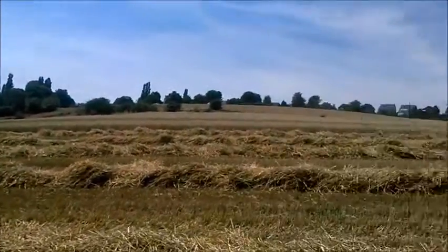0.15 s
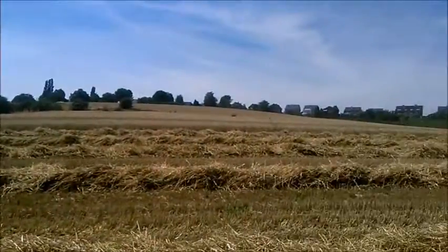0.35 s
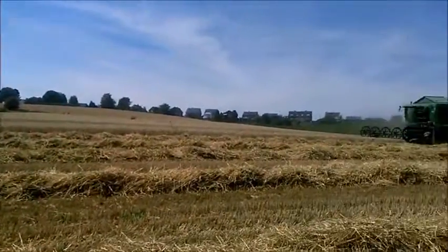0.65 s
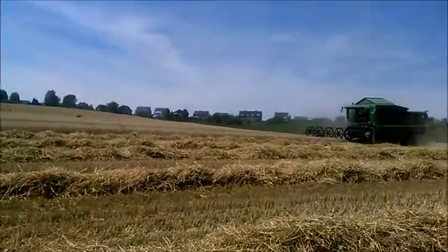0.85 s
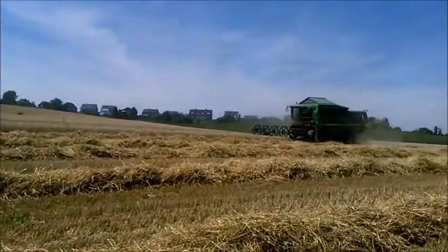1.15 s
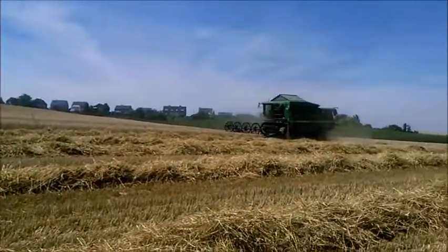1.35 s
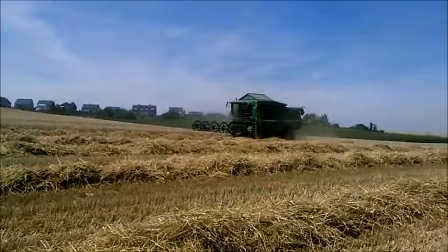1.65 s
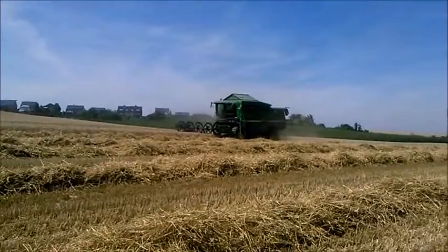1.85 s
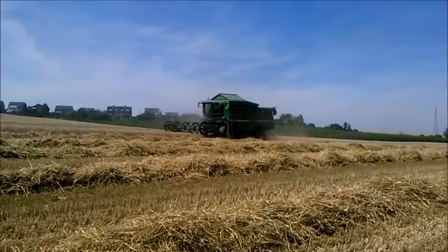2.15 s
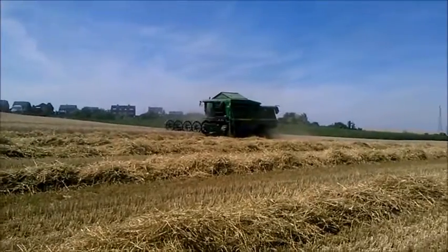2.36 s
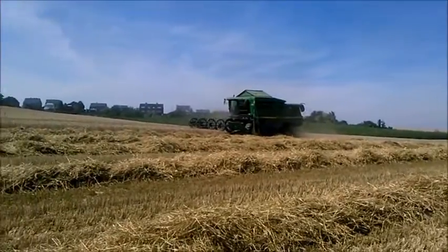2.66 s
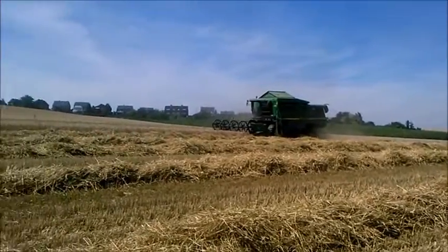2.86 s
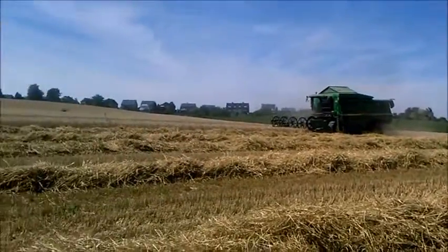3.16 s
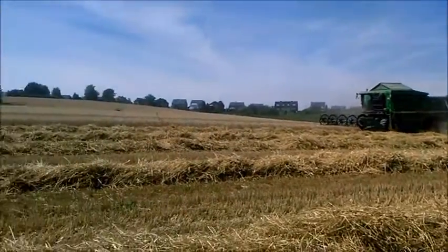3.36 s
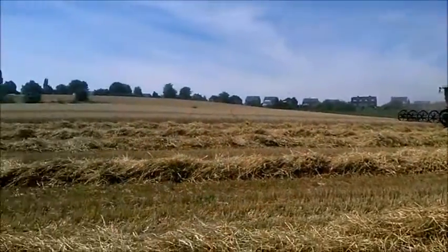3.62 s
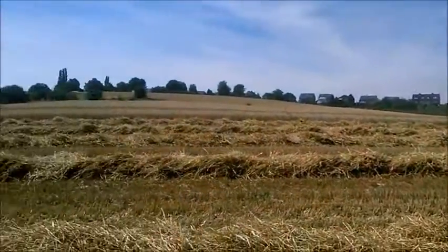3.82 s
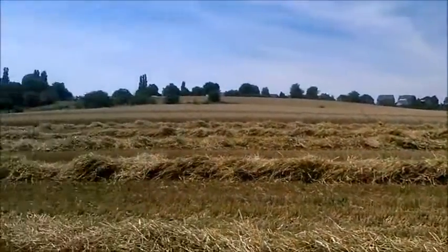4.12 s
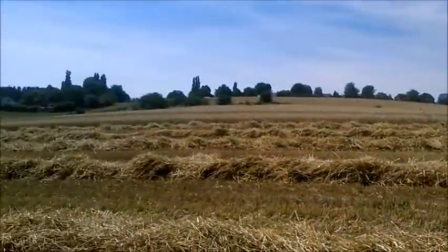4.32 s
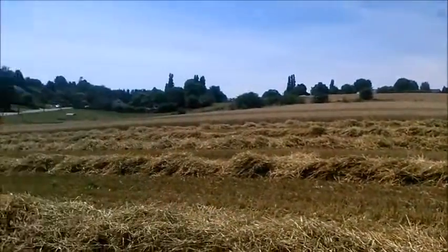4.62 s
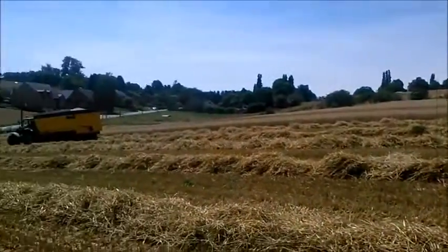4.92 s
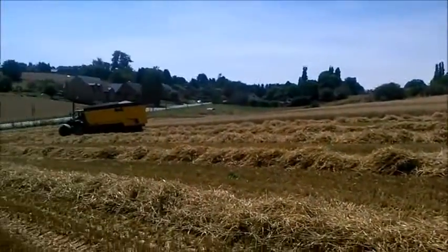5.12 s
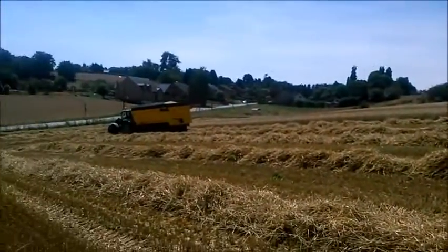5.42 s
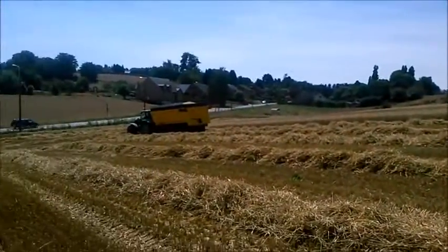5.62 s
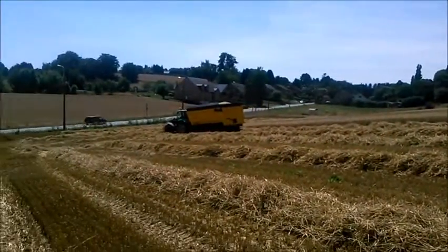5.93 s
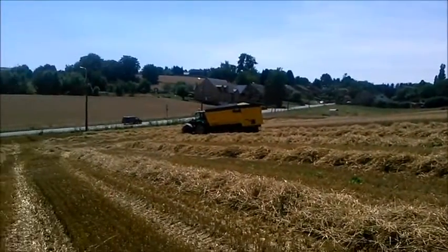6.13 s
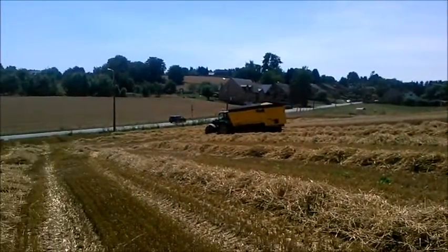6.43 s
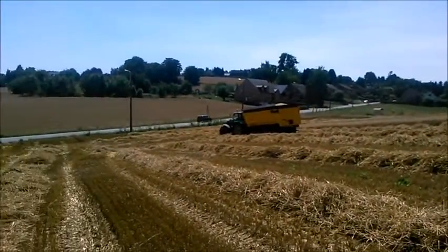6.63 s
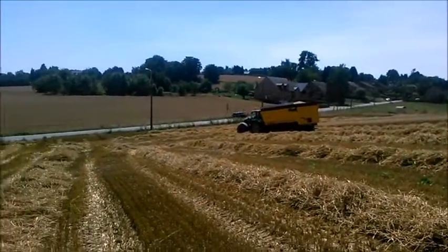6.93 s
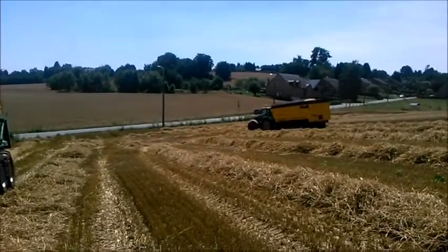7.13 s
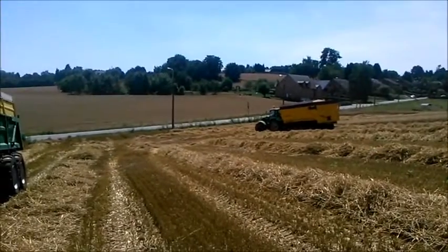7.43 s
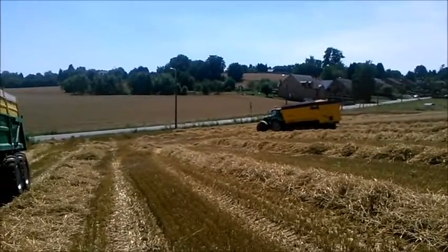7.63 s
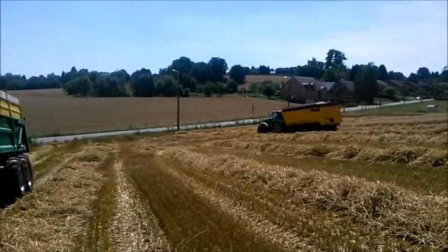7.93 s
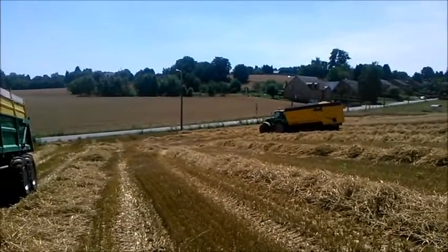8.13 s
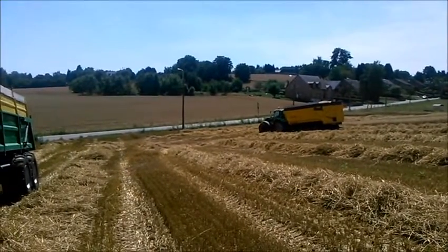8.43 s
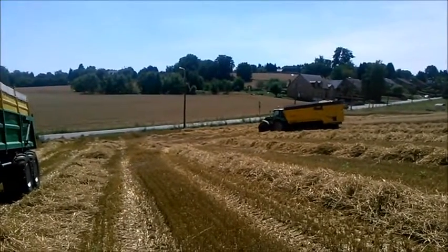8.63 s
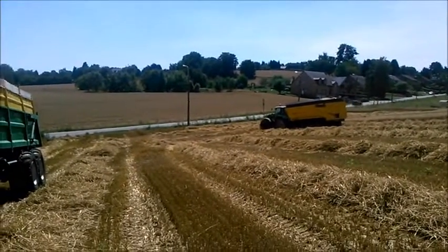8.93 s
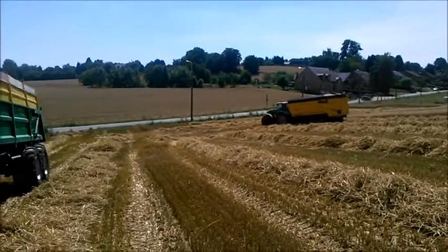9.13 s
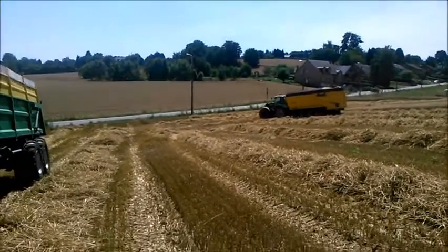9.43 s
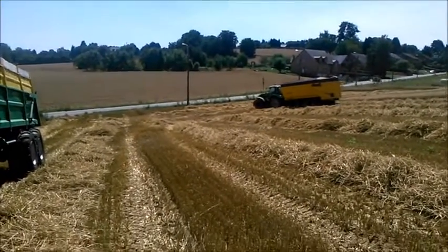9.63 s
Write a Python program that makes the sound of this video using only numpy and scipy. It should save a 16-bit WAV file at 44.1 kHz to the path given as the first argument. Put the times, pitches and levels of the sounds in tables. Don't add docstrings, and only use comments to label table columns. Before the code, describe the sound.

A hand-held microphone in an open stubble field catches an even engine drone with fan and pump tones. Loud low wind rumbles strike at the start and again near five seconds. The roar's hollow colour slides as the holder turns. Stalks crackle nearby in the second half, a faint shaft squeak returns every two seconds, and the pump hum strengthens towards the end.

```python
import sys
import numpy as np
from scipy import signal
from scipy.fft import rfft, irfft
from scipy.io import wavfile
from scipy.ndimage import uniform_filter1d

SR = 44100
rng = np.random.default_rng(int(sys.argv[2]) if len(sys.argv) > 2 else 0)


def amplitude_ratio(level_db):
    exponent = np.asarray(level_db, float) / 20
    return 10 ** exponent


def unload_audio(sound):
    columns = np.transpose(np.atleast_2d(sound))
    steps = np.round(np.clip(columns, -1, 1) * 32767)
    wavfile.write(sys.argv[1], SR, steps.astype(np.int16))


N = 430857
SIZE, HOP = 1024, 256
HZ = np.fft.rfftfreq(SIZE, 1 / SR)
BIN_HZ = HZ[:, None]
FRAME_S = np.arange(N // HOP + 5) * HOP / SR
TIME_S = np.arange(N) / SR
LATE_POWER = 2.5

# (time [s], chest delay [ms], arm delay [ms])
ECHO_DELAYS = [(0, 1.22, .82), (.3, 1.46, .93), (.55, 1.61, 1.04), (.8, 1.7, 1.12), (1.1, 1.755, 1.14),
               (3.1, 1.76, 1.14), (3.5, 1.745, 1.16), (3.9, 1.67, 1.13), (4.5, 1.46, 1.02),
               (4.75, 1.32, .95), (5.25, 1.04, .68), (5.9, .95, .62), (5.95, .94, 1.16), (6.6, .83, 1.13),
               (7, .79, 1.11), (7.6, .775, 1.1), (9.77, .785, 1.11)]
# (time [s], echo delay [ms])
HAND_DELAY = [
    (5.25, .099),
    (6.3, .09),
    (7.6, .075),
    (9.77, .072),
]
# (time [s], level [dB])
PUMP_LOAD = [
    (0, -3.5),
    (2, -0.5),
    (5, -3),
    (7.5, -0.5),
    (8.5, 4),
    (8.8, 6.5),
    (9.77, 3.5),
]


def evened(x):
    return x / np.sqrt(np.mean(abs(x) ** 2) + 1e-20)


def read(points, hz):
    f, value = np.transpose(points)
    return np.interp(np.log(hz + 1), np.log(f + 1), value)


def columns(rows, t):
    s, *rest = np.transpose(rows)
    return [np.interp(t, s, c) for c in rest]


def drift(rate_hz):
    f = np.fft.rfftfreq(N, 1 / SR)
    return evened(irfft(rfft(rng.standard_normal(N)) / (1 + (f / rate_hz) ** 4), N))


def banded(shape, lo_hz, hi_hz):
    inside = (HZ > lo_hz) & (HZ < hi_hz)
    return shape / np.sqrt((abs(shape[inside]) ** 2).sum(0))


def noise(shape, patchy_db, flicker_db):
    a, b, patches = rng.standard_normal((len(FRAME_S), len(HZ), 3)).T
    patches = uniform_filter1d(patches, size=12, axis=0)
    patches = evened(uniform_filter1d(patches, size=14, axis=1))
    flicker = evened(uniform_filter1d(rng.standard_normal(len(FRAME_S)), size=8))
    z = (a + 1j * b) * shape * amplitude_ratio(patchy_db * patches + flicker_db * flicker)
    return signal.istft(z, nperseg=SIZE, noverlap=SIZE - HOP)[1][:N] * 1.137


def colour(x, points, lo_hz, hi_hz):
    f = np.fft.rfftfreq(N, 1 / SR)
    z = rfft(x) * amplitude_ratio(read(points, f))
    inside = (f > lo_hz) & (f < hi_hz)
    rms = np.sqrt(2 * (abs(z[inside]) ** 2).sum()) / N
    return irfft(z, N) / rms


def tone(hz, db, wander_hz, waver_db, rate_hz):
    phase = 2 * np.pi * np.cumsum(hz + wander_hz * drift(rate_hz)) / SR
    return np.sqrt(2) * amplitude_ratio(db + waver_db * drift(rate_hz)) * np.sin(phase)


def swells(t, floor_db, centre_s, half_s, db):
    power = amplitude_ratio(floor_db) ** 2
    for c, h, d in zip(centre_s, half_s, db):
        power = power + amplitude_ratio(d) ** 2 * np.exp(-((t - c) / h) ** 2)
    return 10 * np.log10(power)


def facing(t):
    return np.clip((1.75 - columns(ECHO_DELAYS, t)[0]) / 1.01, 0, 1)


def turned_db(away_db, facing_db, turn):
    return away_db + (facing_db - away_db) * turn


def shade_db():
    # (time [s], lower band [Hz], depth [dB])
    shoulder = [(0, 3750, -7), (.5, 3600, -7), (.95, 3300, -4), (2, 3080, -4), (3.4, 3220, -5),
                (4, 3560, -7), (4.6, 3850, -6), (5.1, 4350, -4), (5.4, 4500, 0)]
    hz, depth_db = columns(shoulder, FRAME_S)
    half_width = .065
    return depth_db * sum(np.exp(-((BIN_HZ / hz - k) / half_width) ** 2) for k in (1, 1.58))


def roar():
    # (time [s], level [dB])
    roar_level = [(0.0, -47.5), (1.88, -46.5), (3.37, -46), (4.33, -47.5), (4.95, -46), (6.37, -47.5),
                  (6.99, -45.5), (7.51, -46.5), (9.06, -45.5), (9.77, -46.5)]
    # (frequency [Hz], density [dB per Hz])
    bass = [(88, -32), (150, -3), (188, -8), (244, -7.5), (340, -22), (462, -16.5), (529, -10),
            (614, -18.5), (792, -14), (900, -21), (1170, -51), (1980, -120)]
    # (frequency [Hz], density [dB per Hz])
    treble = [(1050, -16.5), (1540, -17), (1870, -17.5), (2270, -18.5), (2750, -23.5), (3330, -27.5),
              (4040, -24), (4900, -22), (5940, -29), (7200, -33), (8500, -38.5), (11000, -72)]
    # (time [s], chest [0-1], arm [0-1], hand [0-1])
    echo_share = [(0, .35, 0.2, .7), (1.5, 0.37, 0.3, 0.52), (3.2, 0.35, .2, 0.57), (4, 0.53, 0.22, .55),
                  (4.7, 0.28, 0.43, 0.66), (5.5, .28, .5, 0.65), (5.95, .3, 0.08, 0.74),
                  (8.4, 0.63, 0.13, 0.58), (9.77, 0.36, .15, 0.38)]
    level_db, = columns(roar_level, FRAME_S)
    chest_ms, arm_ms = columns(ECHO_DELAYS, FRAME_S)
    hand_ms, = columns(HAND_DELAY, FRAME_S)
    chest, arm, hand = columns(echo_share, FRAME_S)
    load_db, = columns(PUMP_LOAD, FRAME_S)
    turn = facing(FRAME_S)

    tilt_db = -2 + 4.5 * turn - 0.4 * load_db
    shape_db = read(bass[:-3] + treble, BIN_HZ) + tilt_db * np.log(np.maximum(BIN_HZ, 1000) / 2500)
    shape_db = shape_db + 6.9 * turn * np.exp(-((BIN_HZ - 500) / 300) ** 2)
    shape_db = shape_db + shade_db()

    spin = -2j * np.pi * BIN_HZ / 1000
    body_low_cut = BIN_HZ ** 2 / (BIN_HZ ** 2 + 700 ** 2)
    cloth_loss = .75 / (.35 + .6 * (BIN_HZ / 3000) ** 2) ** .5
    far = body_low_cut * cloth_loss * (chest * np.exp(spin * chest_ms) + arm * np.exp(spin * arm_ms))
    comb = (1 + far) * (1 + hand * np.exp(spin * hand_ms))
    shape = amplitude_ratio(level_db) * banded(amplitude_ratio(shape_db) * comb, 900, 2800)
    body = noise(shape, patchy_db=0.72, flicker_db=0.29)
    return body * (1 + 0.041 * np.cos(2 * np.pi * 118.2 * TIME_S))


def engine_and_drum():
    # (level turned away [dB], level facing [dB])
    firing = [
        (-42.5, -44.5),
        (-42.5, -44),
        (-45, -48.5),
    ]
    late = facing(TIME_S) ** LATE_POWER
    first_db, second_db, drum_db = [turned_db(*levels, late) for levels in firing]
    out = tone(118.2, first_db, 0.5, 1.5, 5.8)
    out += tone(236.4, second_db, .25, 0.88, 4.)
    return out + tone(138.5, drum_db, .8, 2.6, 4.)


def fan():
    # (level turned away [dB], level facing [dB], share of load [0-1])
    blade_orders = [
        (-52.5, -48, .1),
        (-50, -61, 0.11),
        (-50.5, -50.5, 0.88),
    ]
    late = facing(TIME_S) ** LATE_POWER
    load_db, = columns(PUMP_LOAD, TIME_S)
    out = np.zeros(N)
    for order, (away_db, facing_db, share) in enumerate(blade_orders, 1):
        out += tone(266.8 * order, turned_db(away_db, facing_db, late) + share * load_db, 1.185, 0.91, 7.1)
    return out


def pump_and_gears():
    # (frequency [Hz], level [dB])
    pump_orders = [
        (510.5, -64.5),
        (1021, -60),
        (1531.5, -65),
    ]
    # (frequency [Hz], level turned away [dB], level facing [dB], wander [Hz])
    steady_tones = [(59.2, -60, -52.5, 2.8), (69.5, -52, -55, 9.2), (746, -80, -60, 19.8),
                    (1334.3, -62.5, -60.5, 4), (1601, -61.5, -86, 6), (2042, -63.5, -83, 6.1),
                    (2548, -69.5, -65.5, 8.04), (4090, -75, -92, 14), (4570, -82, -88, 16),
                    (5604, -84, -95, 18.3), (6122, -79, -95, 18), (6640, -82, -95, 18)]
    load_db, = columns(PUMP_LOAD, TIME_S)
    mesh_s, rise_s, settle_s = 6.9, .4, .7
    engaged = np.clip(1 + (TIME_S - mesh_s) / rise_s, 0, 1)
    surge_db = 8 * np.exp(-np.maximum(TIME_S - mesh_s, 0) / settle_s)
    out = tone(2711.5, -67 + engaged * (5 + surge_db), 2.53, 2.3, 4.9)
    for hz, db in pump_orders:
        out += tone(hz, db + load_db, 2.18, 2.4, 7.14)
    turn = facing(TIME_S)
    for hz, away_db, facing_db, wander_hz in steady_tones:
        out += tone(hz, turned_db(away_db, facing_db, turn), .3 * wander_hz, 2.36, 5.08)
    return out


def turbo():
    # (time [s], pitch [Hz], level [dB])
    whistle = [(.3, 9450, -82), (.45, 9430, -68), (.75, 9220, -68), (.92, 9260, -65), (1.3, 9170, -69),
               (1.6, 9200, -86), (3.05, 9250, -88), (3.25, 9280, -68), (3.55, 9300, -82), (4, 9190, -77),
               (4.75, 9070, -67), (5.5, 9070, -61), (6.5, 9250, -61), (6.75, 9140, -63), (7.4, 9350, -61),
               (8.1, 9240, -66), (8.9, 9100, -66), (9.77, 9270, -64)]
    hz, db = columns(whistle, TIME_S)
    gaps = np.clip(3 * drift(14), 0, 1)
    return tone(hz, db + 1.1 - 12 * gaps, 18., 2., 14.1)


def rustle():
    # (time [s], level [dB])
    rustle_level = [(0, -59.5), (1.0, -59), (1.41, -65.5), (2.67, -68.5), (3.13, -62), (3.73, -58.5),
                    (4.38, -61), (4.92, -57.5), (5.41, -49), (5.77, -53.5), (5.99, -50.5), (6.45, -55),
                    (6.99, -51.5), (7.7, -54.5), (8.25, -52), (9.22, -51), (9.39, -53), (9.77, -51.5)]
    # (frequency [Hz], density [dB per Hz])
    straw_colour = [(2350, -49), (4000, -8), (4890, -15), (5460, -9.5), (6130, -2), (7190, -4),
                    (9310, -3.5), (12300, -6.5), (14100, -10)]
    # (time [s], half length [s], level [dB])
    crunches = [
        (5.2, .07, -61),
        (5.41, .08, -57),
        (6, .1, -64),
        (9.42, .04, -60),
        (9.565, 0.047, -55),
    ]
    near_db, = columns(rustle_level, FRAME_S)
    hand_ms, = columns(HAND_DELAY, FRAME_S)
    chest_ms = columns(ECHO_DELAYS, FRAME_S)[0]
    turn = facing(FRAME_S)
    open_ms, shut_ms = .099, .074
    cover = ((open_ms - hand_ms) / (open_ms - shut_ms)) ** 2

    crunch_columns = np.transpose(crunches)
    level_db = swells(FRAME_S, near_db, *crunch_columns)
    chaff_db = -60 - 6.5 * turn - 21 * cover
    low_db = swells(FRAME_S, chaff_db, *crunch_columns) - level_db - 0.5
    top_db = -9 + 7.5 * turn ** LATE_POWER + 2.9 * (level_db - near_db)

    shape = banded(amplitude_ratio(read(straw_colour, HZ))[:, None] * np.ones(len(FRAME_S)), 7340, 12100)
    low = 1 / (1 + (BIN_HZ / 7200) ** 12)
    top = 1 / (1 + (12750 / (BIN_HZ + 1)) ** 50)
    echo = 0.54 * (1 - turn) * np.exp(-2j * np.pi * BIN_HZ * chest_ms / 1000)
    shape = shape * (1 + low * echo / (1 + (5000 / (BIN_HZ + 1)) ** 12))
    tilt_db = -5 * (turn - 0.38) * np.clip((BIN_HZ - 10300) / 1800, -.4, 1)
    shape = shape * amplitude_ratio(shade_db() + tilt_db)
    return noise(shape * amplitude_ratio(level_db + low * low_db + top * top_db), patchy_db=1.43, flicker_db=0.67)


def snaps():
    # (time [s], peak level [dB], centre [Hz])
    snap_events = [(5.2174, -45, 9000), (5.225, -36, 4500), (5.2334, -41, 13000), (5.2334, -41, 5500),
                   (5.245, -42, 4500), (5.3732, -39, 9000), (5.4194, -42, 7000), (5.44, -44, 6000),
                   (5.9833, -47, 6000), (7.443, -44, 5500), (9.4174, -43, 7500), (9.5614, -36, 6000)]
    out = np.zeros(N)
    t = np.arange(600) / SR
    for s, db, hz in snap_events:
        band = signal.butter(1, [hz / 1.33 / SR * 2, hz * 1.25 / SR * 2], "band")
        grain = evened(signal.lfilter(*band, rng.standard_normal(600)))
        out[round(s * SR):][:600] += amplitude_ratio(db - 6 - 60 * t / 0.047) * grain
    return out


def squeaks():
    # (time [s], level [dB], length [s])
    squeak_events = [
        (2.06, -69, .07),
        (4.05, -76, .05),
        (6.08, -57, 0.05),
        (8.1, -62, .025),
        (8.13, -59, .05),
    ]
    ring = tone(12300., 0, 60., 3., 60.)
    out = np.zeros(N)
    for s, db, length_s in squeak_events:
        half_s = length_s / 2
        out += amplitude_ratio(db) * ring * np.exp(-((TIME_S - s - half_s) / half_s) ** 4)
    return out


def buffeting():
    # (frequency [Hz], density [dB per Hz])
    buffet_colour = [(8.8, -29), (15, -1.5), (60, -2), (113, -7), (145, -11.5), (209, -20), (225, -18.5),
                     (242, -19), (300, -36), (390, -62), (660, -120)]
    out = colour(rng.standard_normal(N) * amplitude_ratio(2.0 * drift(13.0)), buffet_colour, 16, 110)
    deepest = signal.filtfilt(*signal.butter(2, 60. / SR * 2), out)
    return out - 0.48 * deepest * (TIME_S < 1)


def sharp_eddies(level_db):
    # (frequency [Hz], density [dB per Hz])
    eddy_colour = [(24, -33), (40, -0.5), (158, -0.5), (543, -13.5), (717, -18), (751, -23), (824, -26),
                   (1120, -30), (1310, -40), (1600, -43), (2080, -75), (3520, -120)]
    per_s = 190
    struck = rng.random(N) < per_s / SR
    strength = np.minimum(rng.exponential(1, N), 3)
    pulses = struck * -amplitude_ratio(3.2 * strength + 2.5 * drift(30.0))
    eddies = colour(evened(pulses) + 0.38 * rng.standard_normal(N), eddy_colour, 290, 500)
    dull = signal.filtfilt(*signal.butter(2, 480. / SR * 2), eddies)
    treble_db = 0.52 * np.minimum(level_db + 30.0, 3)
    return dull + (eddies - dull) * amplitude_ratio(treble_db)


def thumps():
    # (time [s], peak level [dB], width [ms])
    thump_events = [(.068, -15.5, .5), (.084, -16.5, 0.53), (.13, -15, .5), (.197, -15, .55),
                    (0.476, -16, .45), (.397, -13, 0.8), (.445, -15, 0.83), (.587, -13, 1.1),
                    (.8, -15, 1.9), (.838, -13.5, 1.5), (3.661, -17, 1.9), (4.388, -17, 1.4),
                    (4.635, -20.5, 1), (4.705, -17, 1.24), (4.817, -15, 0.58), (4.823, -14, 0.45),
                    (4.863, -16, 0.86), (4.958, -14, 0.87), (5.178, -18, 1.5), (4.914, -14, 1.66),
                    (5.906, -18, 0.99)]
    out = np.zeros(N)
    for s, db, width_ms in thump_events:
        u = (TIME_S - s) / (width_ms / 1000)
        slow_push = 0.19 * np.exp(-(u / 9.4) ** 2)
        suck = np.exp(-u ** 2)
        rebound = 0.34 * np.exp(-(u - 2.2) ** 2)
        out += amplitude_ratio(db) * (slow_push - suck + rebound)
    return out


def wind():
    # (time [s], half length [s], deep buffeting [dB], sharp eddies [dB])
    gusts = [(.35, .4, -33, -41), (.11, .05, -26, -34.5), (.2, 0.053, -30, -30.5),
             (0.304, 0.078, -25, -36.5), (0.398, .03, -29, -32), (0.462, 0.042, -30, -33),
             (.59, 0.051, -27.5, -34), (0.678, .05, -32, -36), (.79, 0.054, -33, -34),
             (.88, .04, -33, -43.5), (1.3, .15, -39, -62), (3.66, 0.056, -33.5, -55),
             (4.167, 0.084, -36, -47.5), (4.4, 0.086, -33.5, -42.5), (4.64, 0.028, -33, -43),
             (4.72, 0.039, -22.5, -39), (4.815, 0.036, -25, -36.5), (4.875, 0.036, -26, -35),
             (4.965, .05, -25, -38.5), (5.048, 0.038, -29.5, -42), (5.17, 0.043, -31.5, -49),
             (5.27, 0.036, -28.5, -49), (5.4, 0.056, -36, -51), (5.546, 0.067, -35.5, -49),
             (5.69, .07, -32, -49), (5.91, 0.037, -31, -44), (6.297, .08, -34, -49.5),
             (8.121, .1, -36.5, -52), (8.8, 0.087, -45, -56), (9.27, .06, -35.5, -54)]
    s, half_s, deep, keen = np.transpose(gusts)
    deep_db = np.interp(TIME_S, FRAME_S, swells(FRAME_S, -43.5, s, half_s, deep))
    sharp_db = np.interp(TIME_S, FRAME_S, swells(FRAME_S, -57.5, s, 0.87 * half_s, keen))
    out = amplitude_ratio(deep_db - 1.0) * buffeting() + amplitude_ratio(sharp_db - 1.0) * sharp_eddies(sharp_db)
    limit = .3
    return limit * np.tanh(out / limit) + thumps()


def scene():
    machine = roar() + engine_and_drum() + fan() + pump_and_gears() + turbo()
    straw = rustle() + snaps() + squeaks()
    return (machine + straw + wind())[None]


def roll_off(x):
    return signal.sosfilt(signal.butter(12, 14280, fs=SR, output="sos"), x)


def record(dry):
    mix = signal.lfilter(*signal.butter(1, 12. / SR * 2, "high"), dry)
    return roll_off(mix)


dry = scene()
out = record(dry)
unload_audio(out)
```